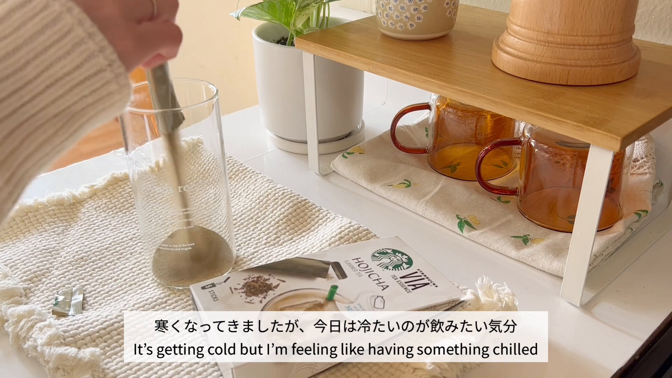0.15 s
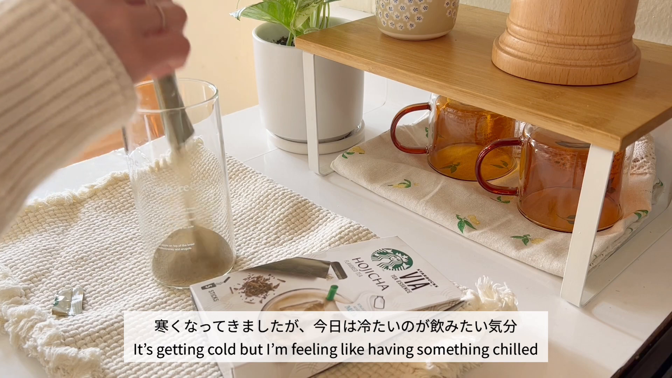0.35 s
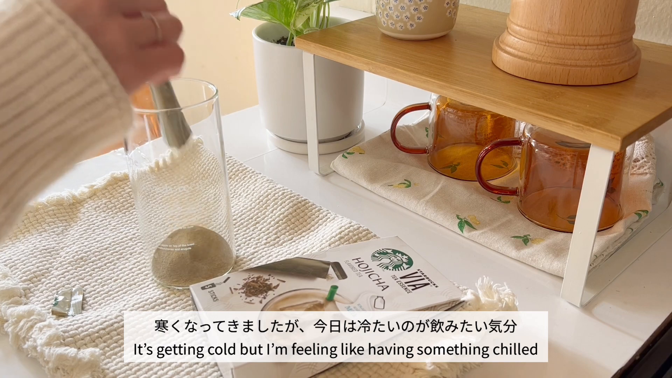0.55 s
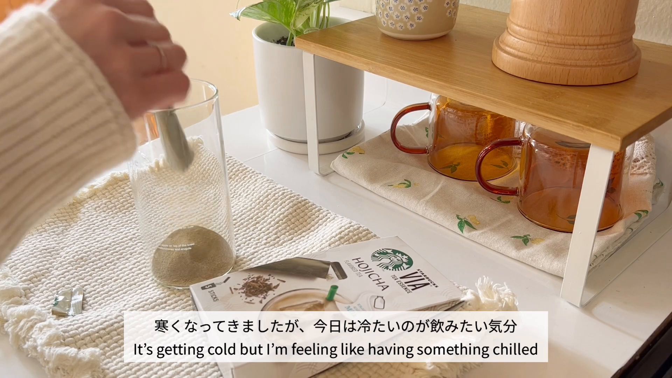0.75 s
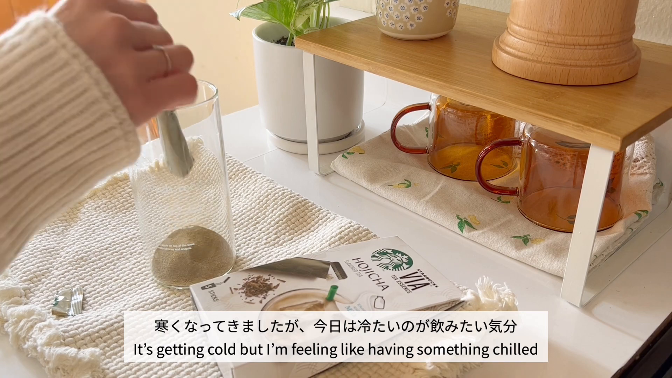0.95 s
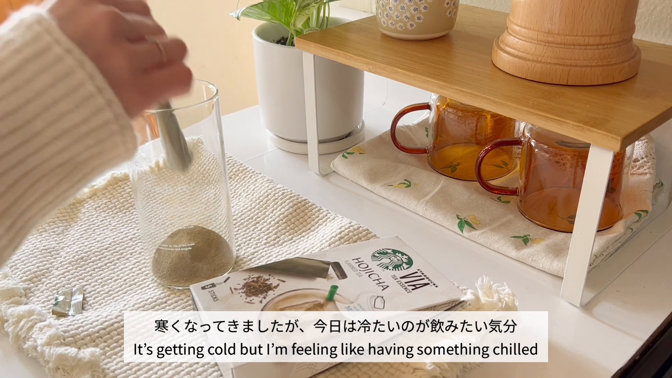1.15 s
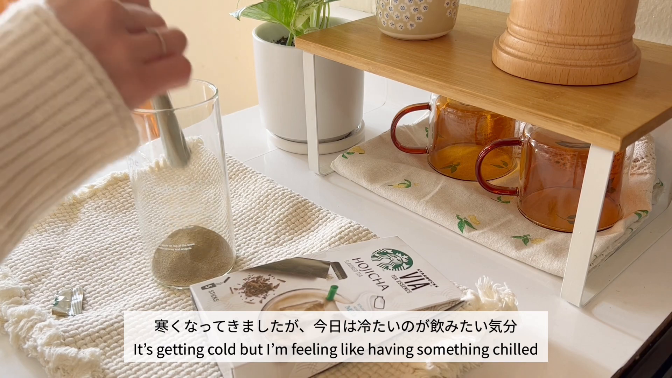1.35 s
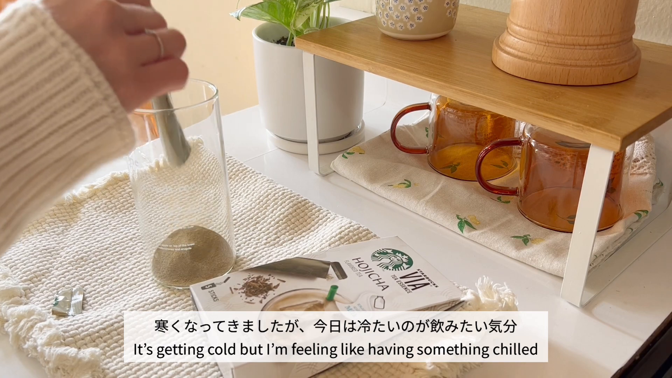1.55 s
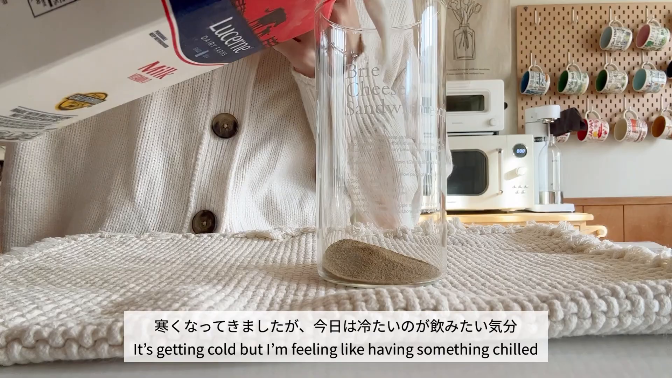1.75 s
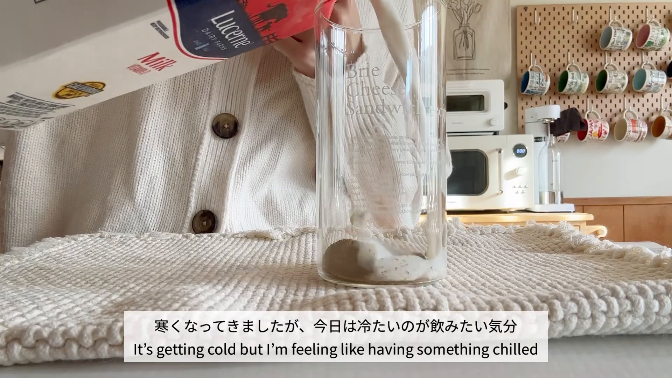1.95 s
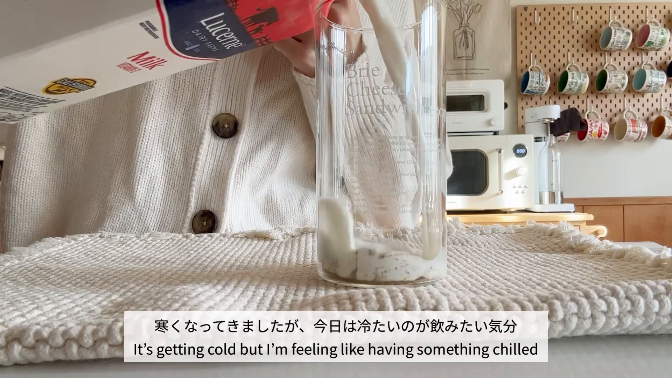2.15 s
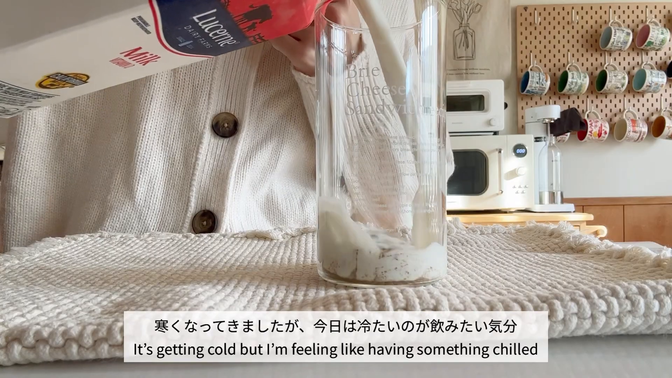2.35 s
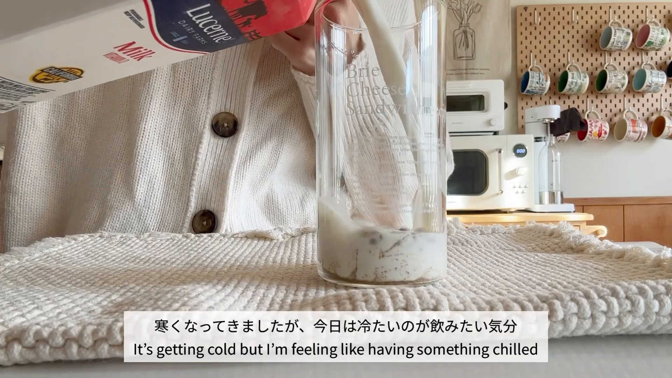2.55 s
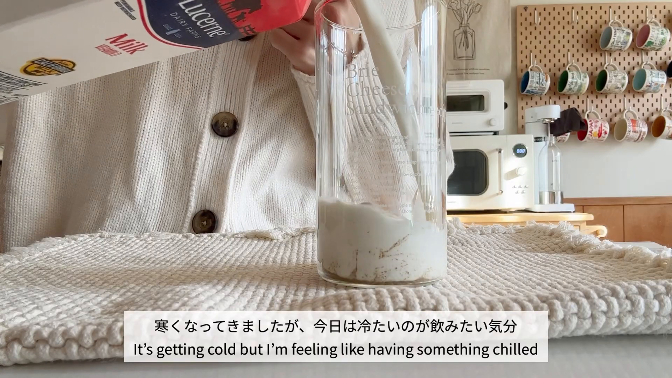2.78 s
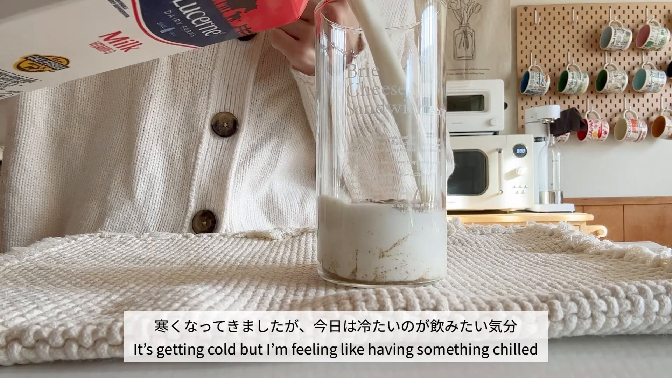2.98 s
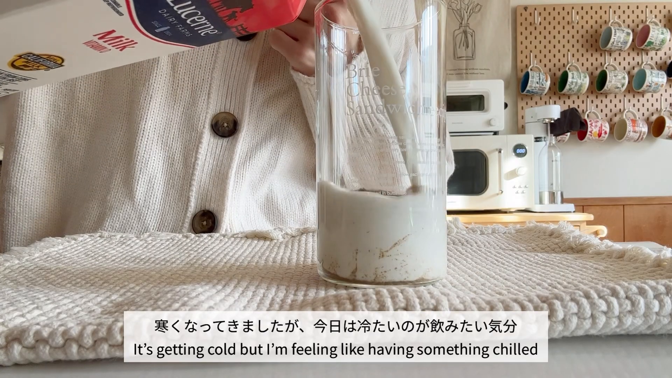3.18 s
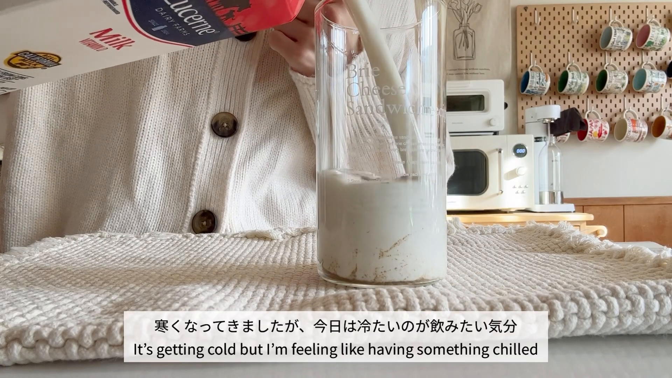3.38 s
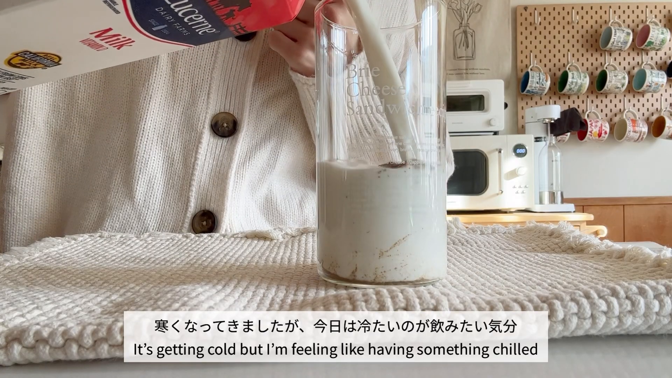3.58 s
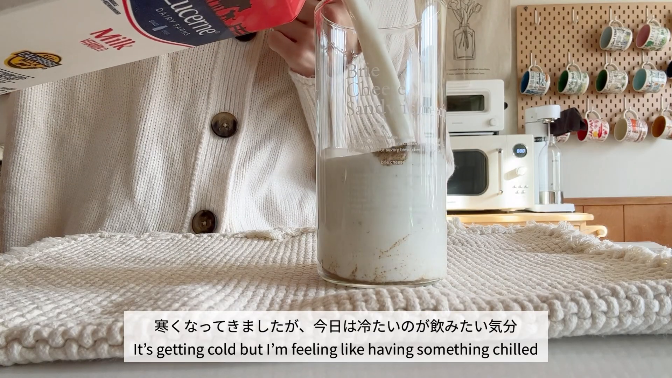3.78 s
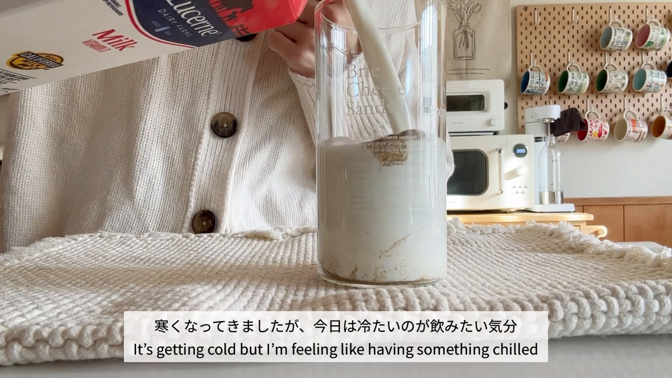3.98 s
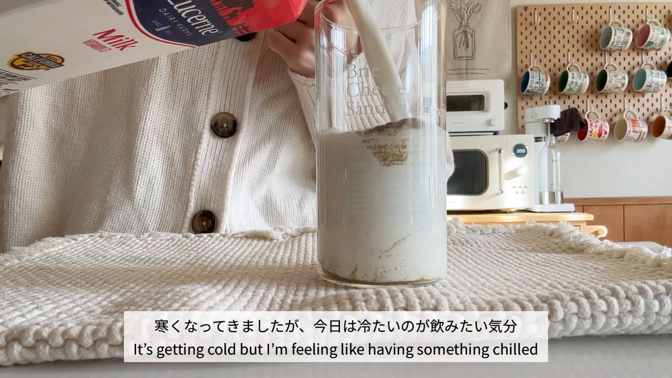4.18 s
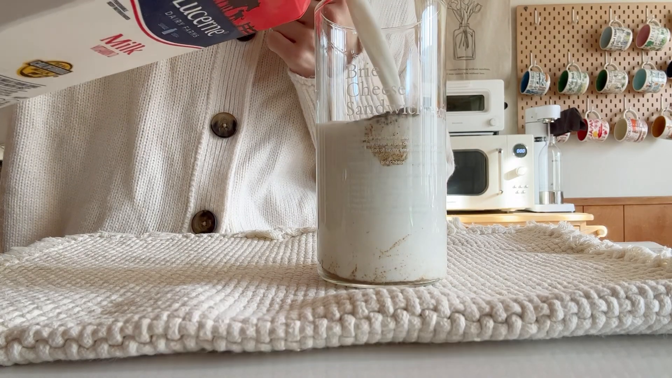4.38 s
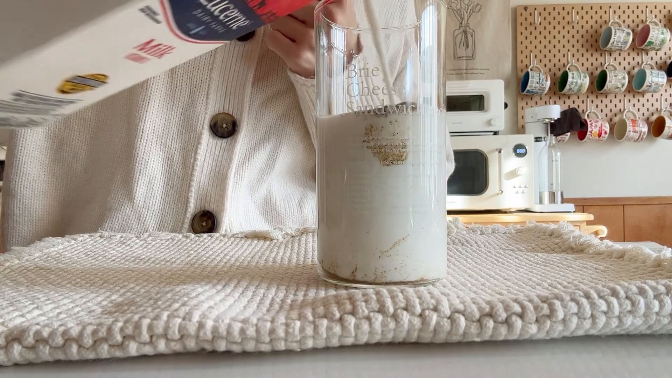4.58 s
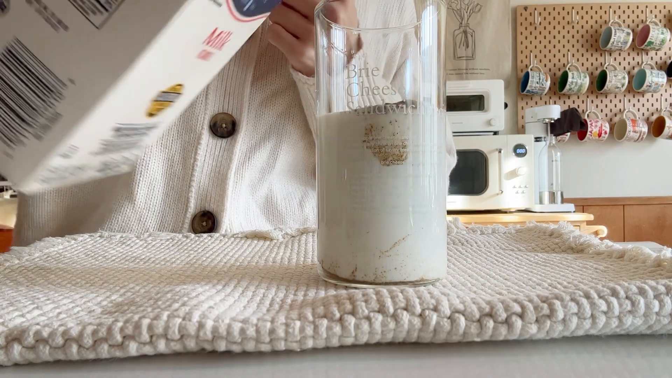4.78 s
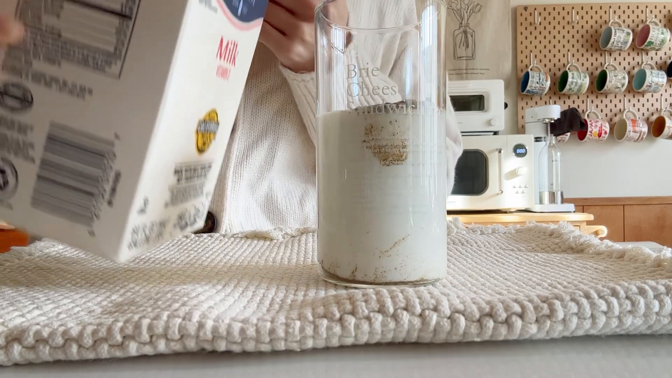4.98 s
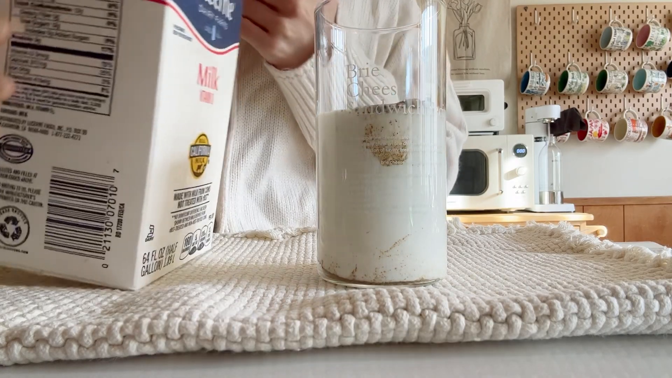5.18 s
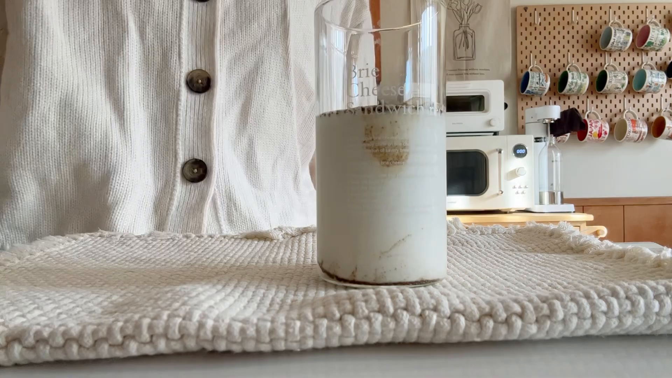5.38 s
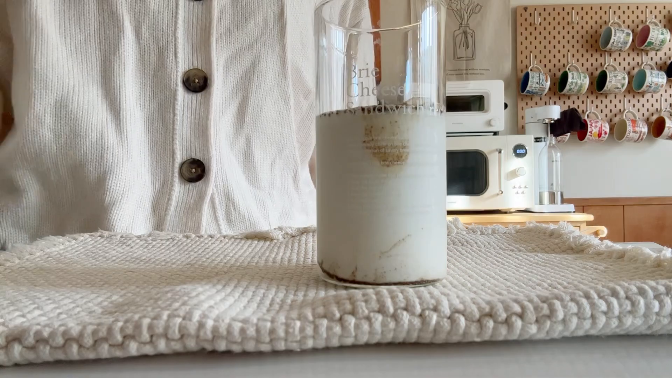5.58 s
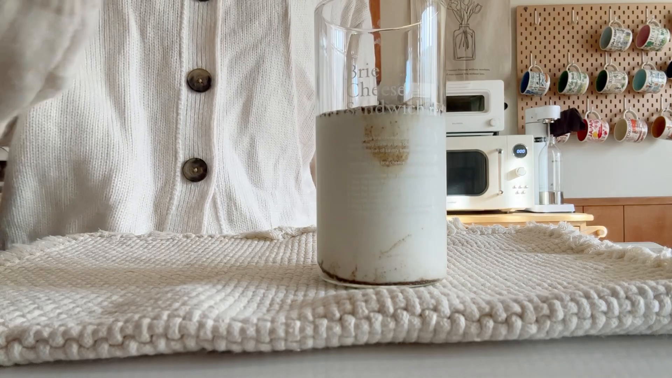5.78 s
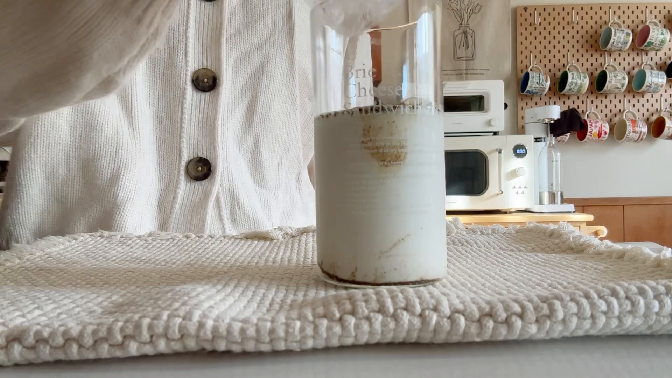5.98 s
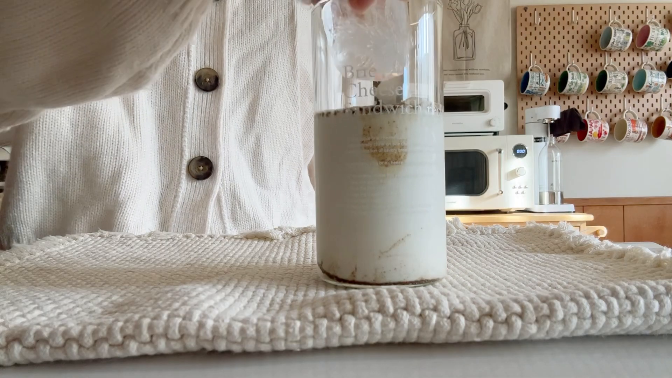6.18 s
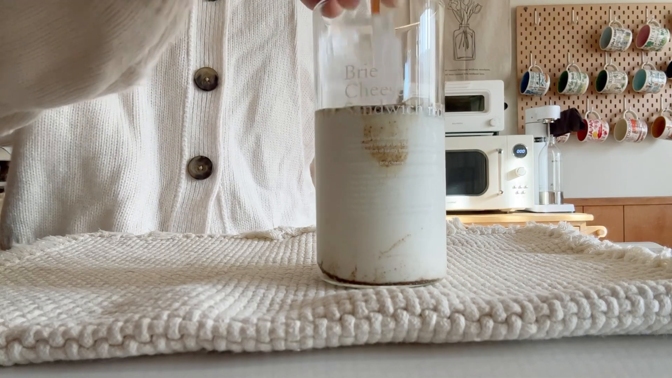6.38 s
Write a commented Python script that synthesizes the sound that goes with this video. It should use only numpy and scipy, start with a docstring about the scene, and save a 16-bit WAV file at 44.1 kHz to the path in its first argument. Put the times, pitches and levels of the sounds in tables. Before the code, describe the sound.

Powder hisses and taps into a glass over a low refrigerator hum, milk splashes, a carton knocks down, then ice clinks loudly on the rim.

```python
"""A refrigerator hums throughout a quiet kitchen heard through two spaced microphones, in three parts.
First, powder hisses (shaped noise) from a tapped sachet into a glass (noise bursts and decaying modes).
Then milk splashes in (bubble chirps, fizz, air column) from a creaking carton that is set down
(noise bursts, decaying modes, sliding fingers as shaped noise). Last, an ice ball bumps and chatters
on the rim of the full glass (ticks, glass modes and table modes)."""
import sys
import numpy as np
from scipy import signal
from scipy.fft import rfft, irfft, next_fast_len
from scipy.io import wavfile
from scipy.ndimage import map_coordinates

SR = 44100
rng = np.random.default_rng(int(sys.argv[2]) if len(sys.argv) > 2 else 0)


def log_audio(samples):
    """Write samples as a 16-bit WAV file to the path given in sys.argv[1]."""
    # one column per channel
    frames = np.atleast_2d(samples).T
    # limit to full scale, then quantise
    limited = np.clip(frames, -1, 1)
    pcm = np.round(limited * 32767).astype(np.int16)
    wavfile.write(sys.argv[1], SR, pcm)


N = 284004
T = np.arange(N) / SR

# ends of the first and second part [t/s]
PART_ENDS = (1.785, 5.415)
# room noise density at the first and the later microphone position, ahead of a low cut
# [f/Hz, level/dB per Hz]
ROOM_FIRST = [(30, -85), (55, -75), (90, -78.5), (160, -79.5), (280, -83.5), (500, -90.5), (800, -97.5),
              (1200, -93.5), (1800, -110.0), (2500, -121.0), (4000, -123.0), (7000, -129.0),
              (10000, -128.0), (13000, -124.0), (15500, -143.0)]
ROOM_LATER = [(30, -89), (55, -75.5), (90, -78), (160, -71), (280, -79.5), (500, -84.5), (800, -91.5),
              (1200, -99.0), (1800, -108.0), (2500, -119.0), (4000, -122.0), (7000, -126.0),
              (10000, -128.0), (13000, -130.0), (15500, -136.0)]
# refrigerator and lamp tones, ahead of swell and wavering
# [f/Hz, level in the first part/dB, level later/dB, wavering share/0-1]
HUM = [(55.7, -58, -59, 0.4), (118.2, -56.5, -54.5, 0.05), (213, -53, -41.5, 0.12), (431, -72, -76.5, 1),
       (3160, -110, -101, 0.9), (8350, -106, -103, 1), (11200, -115, -106, 0.7), (12330, -84.5, -115, .6)]
# swell of the hum as the compressor loads [t/s, level/dB]
SWELL = [(0, 1), (1.8, 1), (2.4, 1.5), (6.44, 2)]
# flow of powder over foil, ahead of its flutter [t/s, level/dB]
POWDER_FLOW = [(0, -66), (.06, -67), (.1, -60.5), (.18, -62), (.23, -70), (.262, -55.5), (.295, -69),
               (.33, -60), (.39, -66.5), (.45, -91), (.47, -62.5), (.55, -89), (.62, -76.5), (.67, -84),
               (.72, -73), (.78, -87.5), (1.6, -90), (1.64, -77.5), (1.78, -72.5)]
# colour of the powder hiss, relative [f/Hz, level/dB]
FOIL_COLOUR = [(1200, -108.5), (1800, -105.0), (2500, -110.0), (4000, -117.0), (7000, -111.0),
               (10000, -105.0), (13000, -105.0), (15500, -109.0)]
# rustle of the sachet at a flow of -70 dB, as the grip eases [t/s, level/dB]
GRIP = [(0, -78), (.7, -76), (1.15, -84), (1.78, -81)]
# colour of the rustle, relative [f/Hz, level/dB]
RUSTLE_COLOUR = [(900, -27), (1500, 2.5), (1680, 7.5), (1900, -9), (3600, 2.5), (5000, -44), (9000, -42)]
# milk splashing on powder: drive of the foam [t/s, level/dB]
SPLASH = [(1.8, -84), (1.93, -89), (2.06, -77.5), (2.15, -71.5), (2.21, -67.5), (2.27, -68.5), (2.34, -63),
          (2.39, -68), (2.48, -65), (2.53, -86.5), (2.7, -85), (3.2, -89.5), (4.7, -87.5)]
# colour of the fizz, relative [f/Hz, level/dB]
FIZZ_COLOUR = [(1800, -103.0), (2500, -109.0), (4000, -102.0), (7000, -112.0), (10000, -104.0),
               (13000, -110.0), (15500, -112.0)]
# the falling stream [t/s, level/dB]
STREAM = [(1.8, -75), (2.03, -71), (3.17, -72), (3.77, -77), (4.0, -75), (4.3, -84), (4.7, -87)]
# colour of the stream, relative [f/Hz, level/dB]
STREAM_COLOUR = [(700, -28.5), (1000, 2.5), (1600, -8.5), (2200, -22.5), (4000, -34.5)]
# single droplets and bursting bubbles, ahead of onset and fade [t/s, level/dB, f/Hz]
DROPS = [(1.8412, -61, 1020), (1.939, -47.5, 7800), (1.9779, -56, 11200), (2.0018, -57, 8300),
         (2.03, -56, 14800), (2.042, -55, 4600), (2.045, -52, 1410), (2.095, -54, 6700),
         (2.1085, -41.5, 5440), (2.152, -50, 3520), (2.203, -59, 1860), (2.203, -48, 5200),
         (2.234, -47, 9600), (2.2563, -48, 10500), (2.267, -44.5, 9600), (2.289, -47, 4950),
         (2.316, -41, 4900), (2.334, -42, 15500), (2.3506, -41, 9500), (2.356, -52, 1860),
         (2.4083, -41.5, 5420), (2.439, -47, 10800), (2.4803, -55, 1450), (2.49, -51.5, 5430),
         (2.528, -60, 15000), (2.5953, -56, 10050), (2.6589, -59.5, 9800), (2.6778, -59, 1990),
         (2.758, -55.5, 8000), (2.7894, -62, 5470), (2.9837, -61, 1570), (2.9855, -60, 4160),
         (3.193, -55, 1550), (3.1942, -55, 2260), (3.1954, -55.5, 4300), (3.2854, -66, 1040),
         (3.8103, -57, 6250), (3.823, -52, 5230), (3.878, -64, 4300), (4.0192, -60.5, 9800),
         (4.2028, -64, 3280), (4.3555, -66, 3350)]
# fingers sliding on the carton, 20 dB of rise and fall in the times given
# [t of firmest touch/s, level/dB, press time/s, release time/s]
HANDS = [(3.831, -81, .05, 0.12), (4.77, -62, 0.042, 0.11), (5.0, -80, .1, 0.18), (5.15, -73.5, .12, 0.047),
         (5.34, -73, .15, 0.26)]
# colour of the sliding, relative [f/Hz, level/dB]
RUB_COLOUR = [(600, -30), (1200, -4), (2200, -7), (3400, 1.5), (5000, -20.5), (12000, -20), (16000, -23.0)]
# pops of the carton wall [t/s, level/dB]
POPS = [(3.821, -35), (4.017, -51), (4.104, -49), (4.748, -47.5)]
# modes of the carton wall [f/Hz, level/dB, t60/s]
CARTON_WALL = [(984, -2, 0.045), (1030, -5, 0.032), (1363, -4, 0.035), (1453, 0, 0.06), (1600, -13, .025),
               (1850, -22.5, 0.023), (3250, -28, 0.025), (4300, -27, .025)]
# ice on the rim [t/s, ring level/dB, tick level/dB]
ICE_CONTACTS = [(5.9940, -13, -23), (5.9999, -18, -35.5), (6.01246, -19, -30), (6.01985, -21, -33),
                (6.0228, -34, -37), (6.3590, -25, -45), (6.364, -36, -47), (6.370, -46, -48),
                (6.414, -58, -45), (6.419, -50, -40), (6.428, -60, -52)]
# modes of the full glass, damped by milk [f/Hz, level/dB, t60/s]
FULL_GLASS = [(1354, 0, .044), (1395, -8, .045), (1344, -44, .45), (1372, -45, .4), (3190, -28, .1),
              (3325, -14, .055), (3324, -44, .65), (3333, -45, .65), (1012, -16, .05), (1500, -24, .025),
              (3420, -27, .08), (4620, -35, .15), (4690, -36, .12), (4780, -34, .08), (8790, -33, .06),
              (8860, -34, .07), (9500, -36, .04)]
# modes of the table under the glass [f/Hz, level/dB, t60/s]
TABLE = [(111, -2.5, 0.3), (161.4, 3, 0.14), (251.5, 4, 0.15), (381, 2, 0.1), (448, 3, 0.14),
         (640, -9, 0.11)]
# modes of the emptier glass, rung by sachet and milk [f/Hz, level/dB, t60/s]
EMPTY_GLASS = [(563, 2, 0.048), (635, -5, 0.044), (1673, -5, 0.055), (1790, -10, .04), (2420, -12, .03),
               (3060, -10, 0.034), (3550, -17.5, 0.033)]
# modes of the carton as a box [f/Hz, level/dB, t60/s]
BOX = [(250, 4, 0.023), (443, 0.5, 0.062), (545, -2, 0.055), (720, -4, 0.027), (960, -4, .035)]
# one low bump through the table [t/s, level/dB, f/Hz]
TABLE_BUMP = (5.09, -33.5, 68)
# taps of the sachet on the empty glass [t/s, thump level/dB, snap level/dB, top over snap/dB]
SACHET_TAPS = [(.3115, -52, -39, 4), (.4654, -60, -65.5, 16), (.833, -48, -74, 11.5),
               (1.278, -54, -62, -10), (1.287, -42, -70, 5), (1.4893, -55.5, -77, 12),
               (1.6563, -57, -76, 14), (1.7567, -51.5, -41, -8.5), (1.7794, -60, -67, -17)]
# milk slapping the glass wall [t/s, thump level/dB, snap level/dB, top over snap/dB]
MILK_SLAPS = [(2.0448, -54, -67, 21), (2.6793, -54.5, -89, 3), (3.1931, -57, -71, -14)]
# the carton gripped, tipped back and set on the mat
# [t/s, thump level/dB, snap level/dB, top over snap/dB]
CARTON_TAPS = [(3.809, -54, -71, -10), (3.8594, -52, -66, -5), (4.7476, -62, -46.5, 0),
               (4.8167, -29.5, -46, 0), (4.8257, -34.5, -64, 2), (4.978, -38, -55, -20),
               (5.249, -53, -52.5, -24), (5.2952, -35, -49, 0.5), (5.315, -50.5, -68, -3),
               (5.368, -64, -64, 6), (5.3924, -30.5, -43, -2.5), (5.401, -38, -63, -4),
               (5.4104, -46, -49, -5)]
# kitchen reverberation [f/Hz, t60/s]
KITCHEN_T60 = [(200, 0.42), (1400, 0.19), (2500, .3), (5000, 0.36), (12000, 0.19)]
# level of the room's answer, one value a part [level/dB]
REVERB_LEVEL = [-7, -11, -15]
# likeness of the two microphones for near sound and for room tone [f/Hz, likeness/0-1]
LIKENESS_NEAR = [(100, .95), (350, .85), (800, .6), (1500, .8), (4000, .5), (6000, .55), (8000, .85),
                 (10000, .99), (16000, .97)]
LIKENESS_ROOM = [(100, 0.82), (350, 0.15), (700, 1), (1000, 0.53), (1500, 0.6), (4000, 0.18), (6000, .3),
                 (8000, 0.93), (10000, 1)]
# phase lead of the right microphone at the first and the later position
# [f/Hz, lead of far sound/rad, lead of near sound/rad]
LEAD_FIRST = [(0, .1, 0), (350, .2, 0), (1000, 2.2, .2), (1600, 2.7, 0), (2000, -.3, -.3), (3000, -1, -1.2),
              (4000, 0, 0), (7000, .1, .1), (10000, 3.14, 3.14), (13000, 6.3, 6.3), (15500, 9.4, 9.4)]
LEAD_LATER = [(0, -.3, 0), (350, -.6, 0), (700, -2.2, 0), (1000, -2.9, .1), (1500, -3.2, .3),
              (2200, -3.5, 1.8), (7000, -5, 1.4), (10000, -6.3, 0), (13000, -9.1, -2.8),
              (15500, -10.2, -3.9)]


def undb(db):
    """The decibel law: level to amplitude gain."""
    return 10 ** (np.asarray(db) / 20)


def unit(x):
    """Normalisation of mean power: rms 1."""
    return x / np.sqrt(np.mean(x ** 2) + 1e-20)


def along(points, hz):
    """Logarithmic frequency scale: (f, value) points are interpolated on it."""
    f, v = np.transpose(points)
    return np.interp(np.log(hz + 1), np.log(f + 1), v)


def gains(rows):
    """Envelopes: a gain per sample for each level column, silent outside the table."""
    s, *columns = np.transpose(rows)
    return [undb(np.interp(T, s, levels, left=-200, right=-200)) for levels in columns]


def following(gain, share):
    """Power-law coupling: a share of the dB swings of a gain around -70 dB."""
    return (gain * undb(70)) ** share


def wobble(rate):
    """Slow random modulation: a smooth curve through rate random knots a second."""
    return map_coordinates(rng.standard_normal(int(N * rate / SR) + 4), [T * rate])


def filtered(x, response):
    """Linear filtering: the spectrum of x is multiplied by a response of frequency."""
    m = next_fast_len(N + 8192)
    return irfft(rfft(x, m) * response(np.fft.rfftfreq(m, 1 / SR)), m)[..., :N]


def noise(spectrum):
    """Spectral shaping: two unrelated white noises take a given density, with a cut near 38 Hz."""
    def response(hz):
        low_cut = 1 / (1 + (38 / (hz + 1)) ** 6)
        return undb(along(spectrum, hz)) * np.sqrt(SR / 2) * low_cut
    return filtered(rng.standard_normal((2, N)), response)


def add(track, s, sound):
    """Superposition: a short sound is mixed in at s seconds."""
    part = track[..., round(s * SR):][..., :sound.shape[-1]]
    part += sound[..., :part.shape[-1]]


def ring(modes, spread_db, attack=0.00065):
    """Modal vibration: a blow excites decaying sines, each at a new random strength."""
    t = T[:SR // 2]
    tones = 0
    for hz, db, t60 in modes:
        strength_db = db + spread_db * rng.standard_normal()
        tones = tones + undb(strength_db - 60 * t / t60) * np.sin(2 * np.pi * hz * t)
    return tones * (1 - np.exp(-t / attack))


def burst(lo_hz, hi_hz, t60, attack=0.0015):
    """Impact noise: a pair of band-limited noises, rms 1 before onset and exponential decay."""
    t = T[:SR // 4]
    band_filter = signal.butter(3, [lo_hz, hi_hz], "band", fs=SR, output="sos")
    band = signal.sosfilt(band_filter, rng.standard_normal((2, len(t))))
    return unit(band) * undb(-60 * t / t60) * (1 - np.exp(-t / attack))


def bubble(hz, cycles):
    """Bubble resonance: a short ring rises in pitch as the bubble nears the surface."""
    turns = hz * T[:900]
    fade = np.exp(-turns / cycles) * np.cos(np.linspace(0, np.pi / 2, len(turns)))
    onset = 1 - np.exp(-turns / 1.0)
    return np.sin(2 * np.pi * turns * (1 + 0.0016 * turns)) * fade * onset


def taps(rows, modes, ring_db, attack):
    """Impact: noise whose brighter bands die faster, and the ringing modes of the body struck."""
    out = np.zeros((2, N))
    for s, thump_db, snap_db, top_db in rows:
        # the middle lies 2 dB under the mean of thump and snap; a weak snap counts as thump - 13.5 dB
        middle_db = (thump_db + max(snap_db, thump_db - 13.5)) / 2 - 2
        add(out, s, undb(snap_db + top_db) * burst(5400, 16000, t60=0.025))
        add(out, s, undb(snap_db) * burst(2500, 6000, t60=0.026))
        add(out, s, undb(middle_db) * burst(700, 3400, t60=0.042))
        add(out, s, undb(thump_db) * burst(210, 660, t60=0.057, attack=0.004))
        add(out[0], s, undb(thump_db + ring_db) * ring(modes, spread_db=1.5, attack=attack))
    return out


def room_tone():
    """Stationary noise and wavering hum tones; both change as the microphones are moved."""
    first = T < PART_ENDS[0]
    air = np.where(first, noise(ROOM_FIRST), noise(ROOM_LATER))
    swell = gains(SWELL)[0] * undb(0.6 * wobble(1.7))  # slow random drift in dB
    for hz, first_db, later_db, waver in HUM:
        # amplitude and phase waver together, faster for higher tones
        swing = 1 + waver * (wobble(16 + 0.0073 * hz) + 1j * wobble(16 + 0.0048 * hz))
        tone = np.real(swing * np.exp(2j * np.pi * hz * T))
        air[0] += undb(np.where(first, first_db, later_db)) * tone * swell
    return air


def kitchen(x):
    """Reverberation: convolution with noise in which each frequency decays at its own rate."""
    hz, t, z = signal.stft(rng.standard_normal((2, SR // 2)), SR, nperseg=256)
    decay = undb(-60 * t / along(KITCHEN_T60, hz)[:, None])
    tail = signal.istft(z * decay, SR, nperseg=256)[1]
    delayed = np.pad(x, (250, 0))[None]  # delay in samples
    return signal.fftconvolve(delayed, tail / np.linalg.norm(tail[0]), axes=1)[:, :N]


def handling():
    """Impact, wall resonance and friction: the carton is tapped, its wall pops, fingers slide."""
    out = taps(CARTON_TAPS, BOX, ring_db=-6.5, attack=0.0014)
    for s, db in POPS:
        add(out[0], s, undb(db) * ring(CARTON_WALL, spread_db=-2.5))
    bump_s, bump_db, bump_hz = TABLE_BUMP
    add(out[0], bump_s, undb(bump_db) * ring([(bump_hz, 0, .09)], spread_db=1, attack=0.009))
    touch = np.zeros(N)
    for s, db, press, release in HANDS:
        touch += undb(db - 20 * np.maximum((s - T) / press, (T - s) / release))
    return out + touch * undb(3.8 * wobble(66)) * unit(noise(RUB_COLOUR))


def powder():
    """Granular flow: grains too fine to tell apart hiss in surges; the squeezed sachet rustles lower."""
    flow, = gains(POWDER_FLOW)
    rustle = gains(GRIP)[0] * following(flow, share=0.4)
    sachet = unit(noise(RUSTLE_COLOUR))
    hiss = flow * undb(2.3 * wobble(39.9)) * unit(noise(FOIL_COLOUR))
    return hiss + rustle * undb(4.7 * wobble(49.4)) * sachet


def bubbling_foam():
    """Random superposition: spatter and small bubble resonances on thin, fluttering fizz."""
    foam = .6 * unit(undb(3.5 * wobble(83)) * noise(FIZZ_COLOUR))
    for when, tone, size, side, life in rng.random((800, 5)):
        hz = 2400 * 6.3 ** tone
        grain = bubble(hz, cycles=1.2 + 18 * life ** 2)  # mostly short spatter, a few that ring
        grain_db = along(FIZZ_COLOUR, hz) + 104.5 - 5.53 * np.log(size + 0.014)
        add(foam, 1.8 + .62 * when, grain * undb(grain_db) * [[1], [side]])
    return foam


def air_column():
    """Column resonance: the pitch of the gurgle rises as milk shortens the air column."""
    gurgle = np.zeros(N)
    for when, tone, size in rng.random((150, 3)):
        s = 1.7 + 1.0 * when
        column_hz = np.interp(s, (1.9, 2.7), (550, 680))
        add(gurgle, s, bubble(column_hz * (1 + .08 * (tone - .5)), cycles=11.5) * (0.4 + size))
    return gurgle


def milk():
    """Bubble and column resonance: foam, the falling stream, the gurgling glass and droplets."""
    splash, stream = gains(SPLASH)[0], gains(STREAM)[0]
    out = splash * bubbling_foam() + stream * unit(noise(STREAM_COLOUR))
    out[0] += undb(-54) * following(splash, share=.75) * air_column()  # -54 dB at a splash of -70 dB
    for s, db, hz in DROPS:
        drop = bubble(hz, cycles=9.9) * [[1], [.3]]
        if hz > 3000:  # high drops land with a tick
            drop = drop + 0.61 * burst(.5 * hz, 16500, t60=0.011)[:, :900]
        add(out, s, undb(db) * drop)
    return out + taps(MILK_SLAPS, EMPTY_GLASS, ring_db=-16.5, attack=0.0025)


def ice():
    """Impact on coupled bodies: each contact ticks, rings the glass and thuds into the table."""
    out = np.zeros((2, N))
    for s, ring_db, tick_db in ICE_CONTACTS:
        add(out[0], s, undb(ring_db) * ring(FULL_GLASS, spread_db=1.5, attack=0.0016))
        add(out[0], s, undb(ring_db - 27.5) * ring(TABLE, spread_db=3))
        add(out, s, undb(tick_db) * burst(2270, 22000, t60=0.0094, attack=0.00034))
    return out * undb(2.4 * wobble(90))  # the ice rocks against the wall and makes the ring waver


def microphones(pair, likeness, column):
    """Partial coherence: a shared and an unrelated part reach two ports with a phase lead."""
    turn = lambda hz: np.arccos(np.clip(along(likeness, hz), 0, 1)) / 2

    def ports(lead):
        lead_hz, lead_rad = np.transpose(lead)[[0, column]]
        half = lambda hz: np.exp(.5j * np.interp(hz, lead_hz, lead_rad))  # half the lead at each port
        left = filtered(pair, lambda hz: [np.cos(turn(hz)) / half(hz), np.sin(turn(hz)) / half(hz)])
        right = filtered(pair, lambda hz: [np.cos(turn(hz)) * half(hz), -np.sin(turn(hz)) * half(hz)])
        return np.array([left.sum(0), right.sum(0)])
    return np.where(T < PART_ENDS[0], ports(LEAD_FIRST), ports(LEAD_LATER))


def scene():
    """Superposition of direct and reverberant sound; near sounds and their tails stop as a part ends."""
    sachet = powder() + taps(SACHET_TAPS, EMPTY_GLASS, ring_db=1.5, attack=0.00056)
    parts = [sachet, milk() + handling(), ice()]
    part_now = np.searchsorted(PART_ENDS, T)
    near = np.zeros((2, N))
    for k, direct in enumerate(parts):
        near += (part_now == k) * (direct + undb(REVERB_LEVEL[k]) * kitchen(direct[0]))
    far = microphones(room_tone(), LIKENESS_ROOM, column=1)
    return far + microphones(near, LIKENESS_NEAR, column=2)


def band_limit(x):
    """A steep low-pass at the top of the band."""
    return signal.sosfilt(signal.butter(12, 17150, fs=SR, output="sos"), x)


def record(dry):
    """Band limitation: a steep low-pass at 16.1 kHz removes the top of the band."""
    mix = filtered(dry, lambda hz: 1 / (1 + (hz / 16100) ** 60))
    return band_limit(mix)


dry = scene()
out = record(dry)
log_audio(out)
```